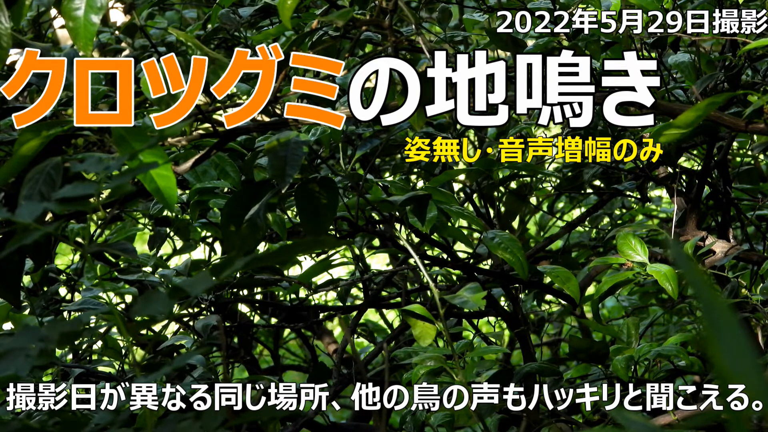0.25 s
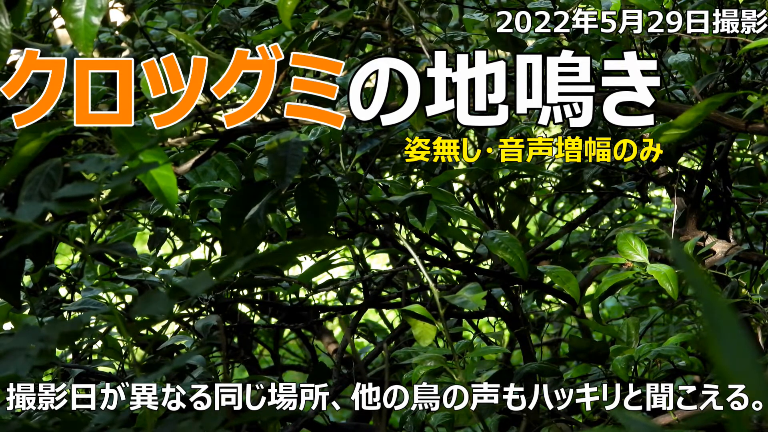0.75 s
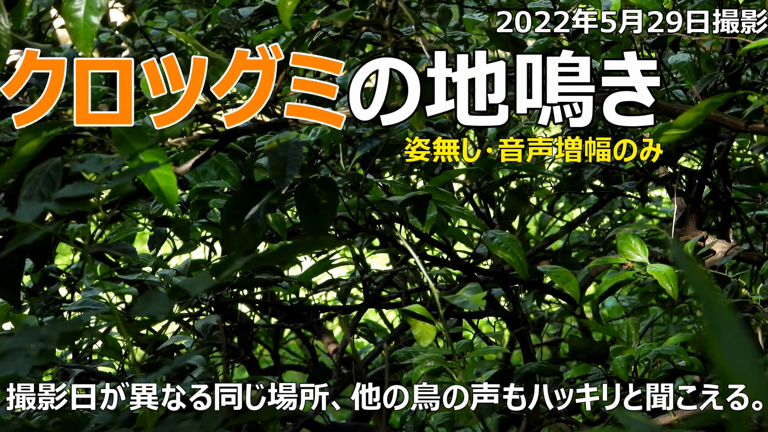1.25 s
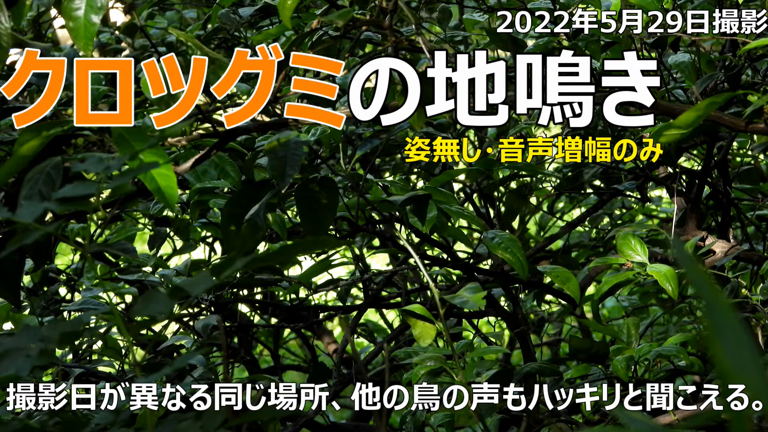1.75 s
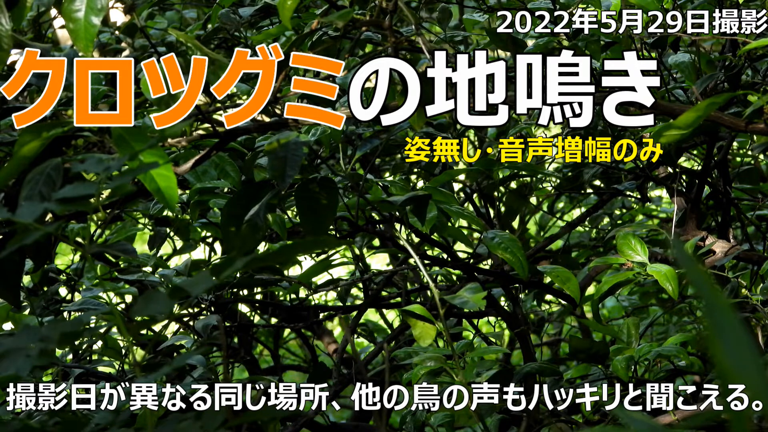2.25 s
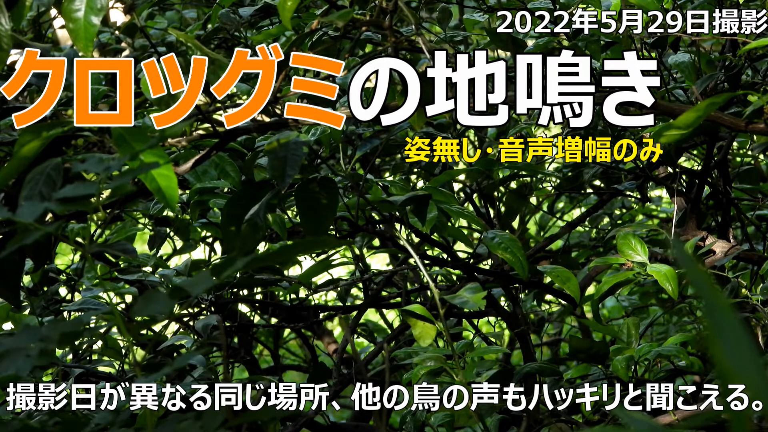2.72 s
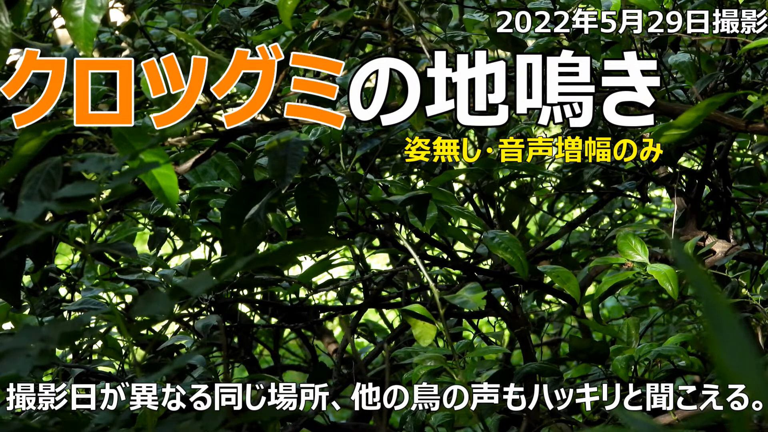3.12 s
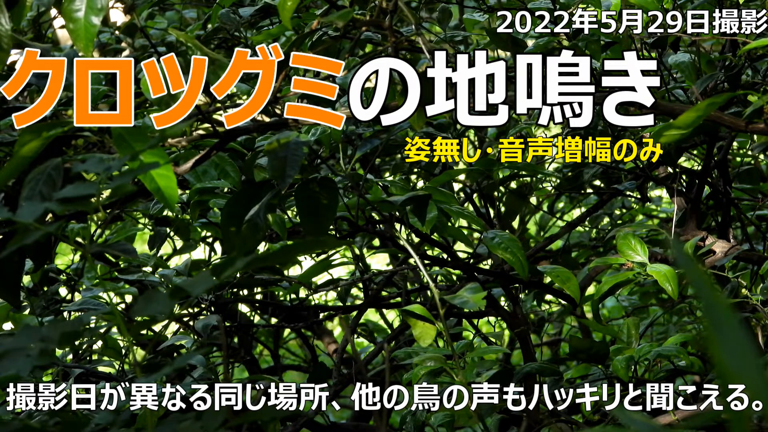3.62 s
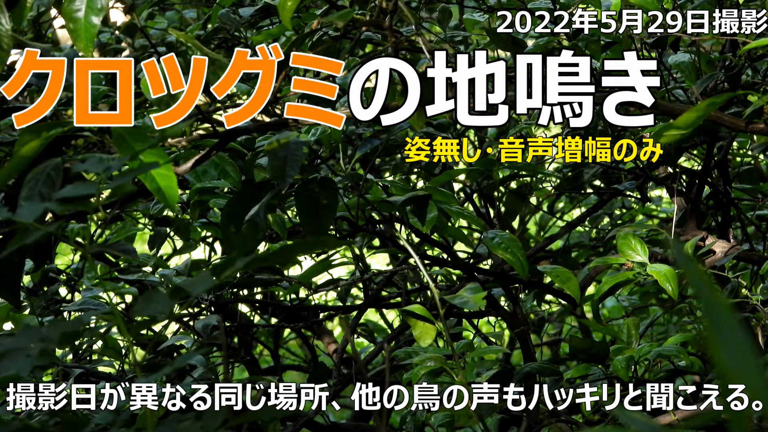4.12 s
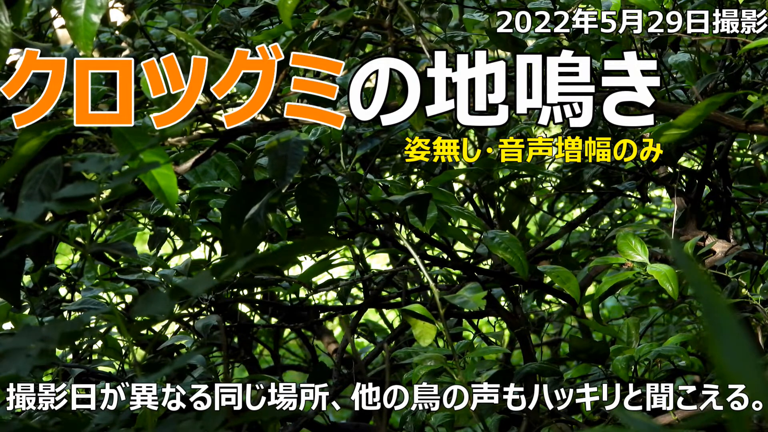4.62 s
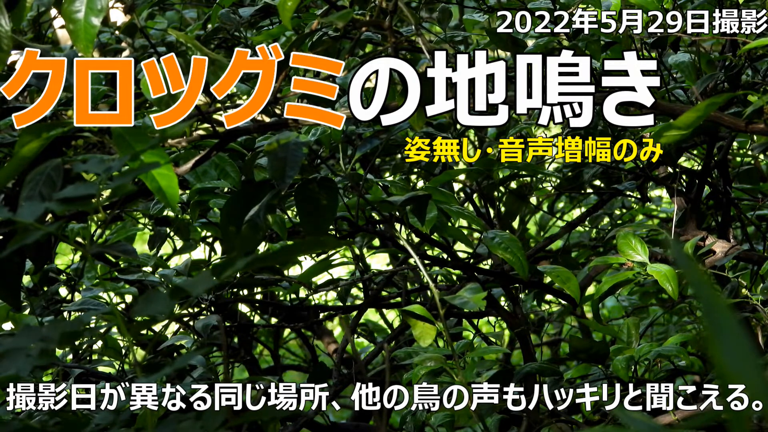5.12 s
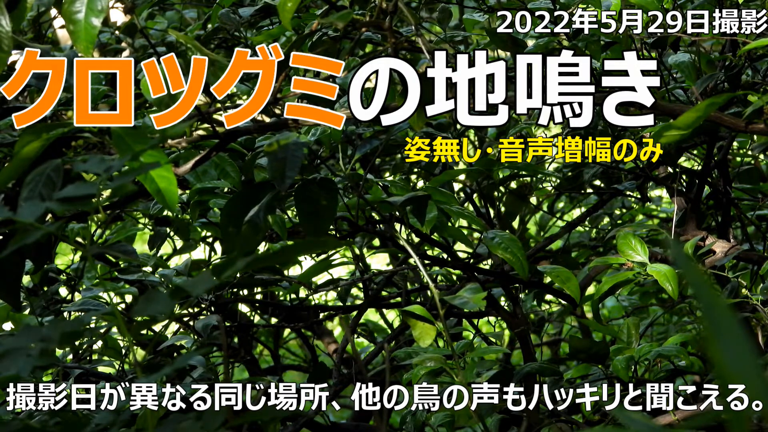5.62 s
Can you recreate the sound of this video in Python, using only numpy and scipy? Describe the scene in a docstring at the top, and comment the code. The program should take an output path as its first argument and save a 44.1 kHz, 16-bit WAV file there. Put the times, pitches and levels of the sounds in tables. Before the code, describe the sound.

A thrush on the left gives sharp chirps, three spaced then a quick run of six, amid hissing woodland with thin high whistles.

```python
"""Woodland undergrowth: a thrush to the left gives sharp chirps, three spaced out, then a quick run of six.
Thin high slides and three soft piping notes fall between them, and other birds call far off.
The calls are gliding tones, each scattered by leaves and trunks into a dying cloud of echoes.
Shaped noise makes a steady hiss and a low drone; near the end the sound breaks off for a moment,
then the hiss returns louder."""
import sys
import numpy as np
from scipy import signal
from scipy.fft import rfft, irfft
from scipy.io import wavfile
from scipy.ndimage import uniform_filter1d

SR = 44100
rng = np.random.default_rng(int(sys.argv[2]) if len(sys.argv) > 2 else 0)


def bounce(signal):
    """Save signal as a 16-bit WAV file at the path given by the first command-line argument."""
    frames = np.transpose(np.atleast_2d(signal))
    limited = np.clip(frames, -1, 1)
    pcm = np.round(limited * 32767).astype(np.int16)
    wavfile.write(sys.argv[1], SR, pcm)


N = 258423
TIME = np.arange(N) / SR
# the sound breaks off, then starts to fade back in [s]
BREAK_S, RETURN_S = 5.684, 5.734
# All levels in dB are relative settings, ahead of any later echoes, mixing and overall gain.


def from_db(db):
    """Turn decibels into a gain."""
    return 10 ** (np.asarray(db) / 20)


def rms_one(x):
    """Scale a sound to unit power."""
    return x / np.sqrt(np.mean(x ** 2) + 1e-20)


def in_time(rows, t=TIME):
    """Join each column of a curve by straight lines in time."""
    s, *columns = np.transpose(rows)
    return [np.interp(t, s, c) for c in columns]


def at_hz(points, hz):
    """Read a spectrum at given pitches, along a log-frequency axis."""
    f, value = np.transpose(points)
    return np.interp(np.log(np.maximum(hz, 1)), np.log(f), value)


def during(start, end):
    """Give the sample numbers of a stretch of time, kept inside the scene."""
    return np.arange(max(int(start * SR), 0), min(int(end * SR), N))


def drift(rate, size):
    """Wander at random: straight lines between points of spread 1, rate points per second."""
    knots = rng.standard_normal(4096)
    return np.interp(np.arange(size) * rate / SR, np.arange(len(knots)), knots)


def phase_of(hz):
    """Add up a gliding pitch into the running phase of its tone."""
    return 2 * np.pi * np.cumsum(hz) / SR


def envelope(t, length, attack, release):
    """Smooth attack, hold and release of a note that starts at t = 0."""
    rise = np.clip(t / attack, 0, 1)
    fall = np.clip((length - t) / release, 0, 1)
    return (np.sin(np.pi / 2 * rise) * np.sin(np.pi / 2 * fall)) ** 2


def narrow_noise(hz, width_hz):
    """Noise ringing in one resonance, at unit power."""
    r = np.exp(-np.pi * width_hz / SR)
    poles = [1, -2 * r * np.cos(2 * np.pi * hz / SR), r * r]
    return rms_one(signal.lfilter([1, 0, -1], poles, rng.standard_normal(N)))


def hiss():
    """Far leaves and air: noise that is partly shared by the two ears, with a treble that rises and falls."""
    # colour of the hiss; only its shape counts: (frequency [Hz], level per Hz [dB])
    colour_points = [(25, -30.5), (75, -34.5), (160, -9.5), (280, -3.5), (400, -7), (550, -10), (870, -7),
                     (1800, -16), (2900, -13), (3700, -18), (4500, -20), (6000, -28), (7800, -37.5),
                     (9000, -58.5)]
    # how alike the two ears are, held between 0 and 0.98 in use: (frequency [Hz], likeness)
    likeness = [(60, -0.31), (140, 1), (320, 0.67), (750, 0.39), (1730, 0.68), (4000, -2.6), (9260, -0.34)]
    # how far the hiss leans to the left: (frequency [Hz], left minus right [dB])
    left_lean = [(60, 0.0), (210, 1.0), (750, 0.5), (2630, 0.72), (9260, 0.29)]
    # treble curve; only its swing about the average counts: (time [s], level [dB])
    treble_curve = [(0.0, -65), (0.69, -73.5), (0.92, -67), (2.67, -61), (2.85, -68.5), (4.29, -61.5),
                    (5.6, -70)]
    level_db, return_db = -50.5, 4.5   # base level; extra from the break on
    low_db, treble_base_db = -1.37, 1.5
    swing_share = 0.54   # share of the treble swing that is followed

    hz = np.arange(N // 2 + 1) * SR / N
    mid, side = rfft(rng.standard_normal((2, N)))
    alike = np.clip(at_hz(likeness, hz), 0, .98)
    sides = np.array([[1], [-1]])
    rolloff = np.sqrt(1 + (hz / 10000) ** 24)
    colour = from_db(at_hz(colour_points, hz) + sides * at_hz(left_lean, hz) / 2) / rolloff
    ears = np.sqrt(1 + alike) * mid + sides * np.sqrt(1 - alike) * side
    air = rms_one(irfft(colour * ears, N))
    low = irfft(rfft(air) / (1 + (hz / 2000) ** 8), N)
    treble = air - low
    swing_db, = in_time(treble_curve)
    # the treble stops swinging at the break
    treble_db = treble_base_db + swing_share * (swing_db - swing_db.mean()) * (TIME < BREAK_S)
    loudness = from_db(level_db + return_db * (TIME > BREAK_S))
    return loudness * (from_db(low_db) * low + from_db(treble_db) * treble)


def drone():
    """A far low hum and a broad rush, both resonant noise, swell now and then under a faint steady tone."""
    # swells: (time of the peak [s], half width [s], added hum [dB], added rush [dB])
    swells = [(.4, .5, -88, -60.5), (.96, 0.21, -61, -62.5), (1.41, 0.032, -52.5, -85),
              (4.54, 0.076, -58.5, -68), (4.73, 0.11, -50.5, -76)]
    hum, rush = from_db(-62), from_db(-64)   # at rest
    for s, width, hum_db, rush_db in swells:
        swell = np.exp(-((TIME - s) / width) ** 2)
        hum = hum + from_db(hum_db) * swell
        rush = rush + from_db(rush_db) * swell
    sound = hum * narrow_noise(292.7, 52)
    sound = sound + rush * narrow_noise(430.0, 190)
    sound = sound + from_db(-61.5) * narrow_noise(772, 28)
    # distance dulls it
    return signal.sosfilt(signal.butter(2, 1100, fs=SR, output="sos"), sound)


def slides():
    """Nearly pure whistles that drop fast and level off, growing louder as they drop, with a slight tremble."""
    # slides: (time [s], length [s], level [dB], final pitch [Hz], glide time [s],
    #          bend: 1 eases off evenly, 2 lingers then plunges)
    slide_rows = [ (-.12, 0.21, -54, 6770, 0.069, 1.3), (1.24, .2, -40, 6780, 0.049, 1.18),
                  (1.748, 0.16, -40.5, 6734, .047, 1.62), (3.635, 0.21, -43.5, 7260, 0.062, 1),
                  (5.093, 0.27, -43, 6850, 0.094, 1.15)]
    start_hz = 9960   # every slide heads down from here
    faint_db, faint_power = -31.5, 2.38   # how much fainter the top is, and how soon that wears off
    attack_s, release_s = 0.011, 0.047
    out = np.zeros(N)
    for s, length, level_db, final_hz, glide, bend in slide_rows:
        at = during(s, s + length)
        t = np.maximum(TIME[at] - s, 0)
        height = np.exp(-(t / glide) ** bend)   # 1 at the top, towards 0 at the final pitch
        hz = final_hz + (start_hz - final_hz) * height
        loudness = from_db(level_db + faint_db * height ** faint_power)
        loudness = loudness * envelope(t, length, attack_s, release_s)
        phase = phase_of(hz * (1 + .007 * drift(350, len(at))))
        out[at] += loudness * np.sin(phase)
    return out


def chirp_gesture(t, level_db, crest_hz, lowest_hz, catch, fall, upsweep_db):
    """Pitch and loudness of a chirp, t from its crest: upsweep, catch, scoop, loud fall and faint trail."""
    # the soft upsweep grows as it climbs
    upsweep_s, upsweep_from_hz, upsweep_to_hz, growth_db = 0.0089, 2450, 3815, 3.5
    # the voice returns for the last share of the catch and scoops up to the crest
    voiced_share, scoop_hz_per_s = .55, 60400
    # it falls towards its lowest pitch, fading, and trails off for a further share of the fall
    steepness, fade_db, trail_db = 1.42, 7, -10
    attack_s, release_s = 0.0013, 0.0043

    voiced = voiced_share * catch
    swept = t + catch + upsweep_s
    climbed = np.minimum(swept / upsweep_s, 1)
    up_hz = upsweep_from_hz + (upsweep_to_hz - upsweep_from_hz) * climbed
    scoop_hz = crest_hz + scoop_hz_per_s * voiced * np.sin(np.pi * t / voiced)
    fallen = np.maximum(t, 0) / fall
    fall_hz = lowest_hz + (crest_hz - lowest_hz) * np.exp(-steepness * fallen)
    hz = np.select([t < -voiced, t < 0], [up_hz, scoop_hz], fall_hz)

    upsweep = from_db(upsweep_db - growth_db * (1 - climbed))
    upsweep = upsweep * envelope(swept, upsweep_s + attack_s, attack_s, attack_s)
    loud = envelope(t + voiced, voiced + fall, attack_s, release_s)
    trail = from_db(trail_db) * envelope(t, fall * (1 + TRAIL_SHARE), fall, fall)
    return hz, upsweep + from_db(level_db - fade_db * fallen) * (loud + trail)


# lead-in and trail of a chirp: upsweep length [s], and trail as a share of the fall
UPSWEEP_S, TRAIL_SHARE = 0.0089, 2.2


def chirps(tremble=0.041, upper_tremble=0.034):
    """The syrinx (voice organ) runs through fast gestures: gives the main voice, and the upper voice with rasp."""
    # chirps: (time of the crest [s], level [dB], crest pitch [Hz], lowest pitch [Hz],
    #          catch before the crest [s], length of the fall [s], upsweep [dB], rasp [dB],
    #          upper voice pitch [Hz], upper voice level [dB])
    chirp_rows = [ (.068, -24.5, 3550, 1490, .001, .0125, -26, -23, 4100, -55),
                  (.798, -21.5, 3567, 1520, .001, .013, -23.5, -13.5, 4860, -34),
                  (1.031, -22.5, 3635, 1780, .0115, .017, -27.5, -7, 4180, -28.5),
                  (4.0279, -20.5, 3156, 1753, .009, .0155, -26, -15.5, 4316, -27),
                  (4.1917, -21, 3335, 1790, .009, 0.012, -28.5, -10.5, 4380, -26),
                  (4.2802, -22, 3240, 1778, .009, 0.013, -29, -9, 4260, -26),
                  (4.4002, -22, 3390, 1860, .0085, 0.014, -30.5, -11, 4260, -30),
                  (4.5446, -20, 3518, 1857, .009, 0.014, -27.5, -11, 4560, -26),
                  (4.7922, -20, 3600, 1885, .012, 0.012, -28.5, -6.5, 4380, -26)]
    # overtone colour of the thrush's throat: (frequency [Hz], level [dB])
    throat = [(3000, -18), (4500, 8.5), (5200, -9.5), (6200, -8), (7200, -12), (8300, -24), (11500, -46.5)]
    # the upper voice joins at the crest, arches over and droops (a share of its pitch)
    upper_s, top_s, droop = 0.0175, 0.0048, 0.23
    upper_attack_s, upper_release_s = 0.0029, 0.0064
    main, upper = np.zeros((2, N))
    for s, level_db, crest_hz, lowest_hz, catch, fall, upsweep_db, rasp_db, upper_hz, upper_db in chirp_rows:
        at = during(s - catch - UPSWEEP_S, s + fall * (1 + TRAIL_SHARE))
        hz, loudness = chirp_gesture(TIME[at] - s, level_db, crest_hz, lowest_hz, catch, fall, upsweep_db)
        hz = hz * (1 + tremble * drift(869, len(at)))
        phase = phase_of(hz)
        main[at] += loudness * np.sin(phase)
        # rasp: overtones roughened by a fast random wander
        overtones = sum(from_db(at_hz(throat, k * hz)) * np.sin(k * phase) for k in (2, 3))
        upper[at] += loudness * from_db(rasp_db) * overtones * drift(2500, len(at))
        # the other side of the syrinx sounds a short note of its own
        at = during(s, s + upper_s)
        t = TIME[at] - s
        hz = upper_hz * (1 - droop * ((t - top_s) / (upper_s - top_s)) ** 2)
        hz = hz * (1 + upper_tremble * drift(950, len(at)))
        loudness = from_db(upper_db) * envelope(t, upper_s, upper_attack_s, upper_release_s)
        upper[at] += loudness * np.sin(phase_of(hz))
    return main, upper


def faint_notes(count=40):
    """List the faintest birds' notes: one repeated falling tick, and short glides at random times and pitches."""
    # ticks of a small far bird: (time [s], level [dB])
    ticks = [(0.329, -62), (3.209, -62.5), (3.37, -64), (4.701, -63)]
    tick_s, tick_hz, tick_warble = 0.05, (7800, 7400, 7140), .015
    notes = [(s, tick_s, *tick_hz, level_db, tick_warble) for s, level_db in ticks]

    per_s, typical_s, level_db = 3.3, .1, -65
    lowest_hz, highest_hz = 3780, 6470   # range of the middle pitch
    most_glide, warble = .08, .05   # shares of the pitch; the glide is to either side of the middle
    for k, (when, size, height, slope) in enumerate(rng.random((count, 4))):
        start = (k + when) / per_s
        length = typical_s * (.5 + size)
        hz = lowest_hz * (highest_hz / lowest_hz) ** height
        glide_hz = hz * most_glide * (2 * slope - 1)
        notes.append((start, length, hz - glide_hz, hz, hz + glide_hz, level_db, warble))
    return notes


def far_calls(calls, nasal=False):
    """Each note swells and fades along a curved, warbling glide: a pure tone, or a stack of harmonics."""
    # overtone colour of the nasal calls: (frequency [Hz], level [dB])
    nasal_colour = [(1700, -25), (2700, -2.5), (3500, 3), (4400, -9), (7100, -5.5), (8000, -9), (9000, -64)]
    out = np.zeros(N)
    for s, length, first_hz, middle_hz, last_hz, level_db, warble in calls:
        at = during(s, s + length)
        along = np.clip((TIME[at] - s) / length, 0, 1)
        curve = np.polyfit([0, .5, 1], [first_hz, middle_hz, last_hz], 2)
        hz = np.polyval(curve, along)
        phase = phase_of(hz * (1 + warble * drift(220, len(at))))
        if nasal:
            tone = sum(from_db(at_hz(nasal_colour, k * hz)) * np.sin(k * phase) for k in range(2, 11))
        else:
            tone = np.sin(phase)
        out[at] += from_db(level_db) * np.sqrt(abs(np.sin(np.pi * along))) * tone
    return out


def pipes(fourth_db=-29, sixth_db=-56, fifth_db=-17):
    """The throat picks out the second harmonic; the odd ones break through as a note arches over and sags."""
    # piping notes: (time [s], length [s], top of the fundamental [Hz],
    #                scoop into the note [share of the pitch], level [dB], odd harmonics [dB])
    pipe_rows = [ (1.901, 0.16, 1617, .13, -37.5, -75), (2.184, .118, 1608, .1, -32, -66),
                 (2.38, .165, 1649, .19, -29, -54.5)]
    top, attack, release = .52, 0.32, 0.42   # shares of the note
    sag, odd_rise_db = 0.078, 15.5   # final sag as a share of the pitch; how it lifts the odd harmonics
    out = np.zeros(N)
    for s, length, top_hz, scoop, level_db, odd_db in pipe_rows:
        at = during(s, s + length)
        along = (TIME[at] - s) / length
        rising = np.maximum(1 - along / top, 0) ** 3
        sagging = np.maximum((along - top) / (1 - top), 0) ** 2
        hz = top_hz * (1 - scoop * rising - sag * sagging)
        phase = phase_of(hz * (1 + .0035 * drift(200, len(at))))
        flutter = from_db(4.5 * drift(70, len(at)))
        high_even = from_db(fourth_db) * np.sin(4 * phase) + from_db(sixth_db) * np.sin(6 * phase)
        even = np.sin(2 * phase) + flutter * high_even
        odd = flutter * (np.sin(3 * phase) + from_db(fifth_db) * np.sin(5 * phase))
        soft_ends = signal.windows.tukey(len(at), .2)
        out[at] += from_db(level_db) * envelope(along, 0.97, attack, release) * even
        out[at] += from_db(odd_db + odd_rise_db * sagging) * soft_ends * odd
    return out


def scatter(t60, onset_s):
    """A cloud of echoes in each ear, dying by 60 dB in t60 seconds, of unit energy and even colour."""
    t = np.arange(SR) / SR
    shape = from_db(-60 * t / t60) * (1 - np.exp(-(t / onset_s) ** 2))
    cloud = rng.standard_normal((2, SR)) * shape
    spectrum = rfft(cloud)
    smooth_power = uniform_filter1d(abs(spectrum) ** 2, size=250, axis=1)
    cloud = irfft(spectrum / np.sqrt(smooth_power), SR)
    cloud *= t < t60
    return cloud / np.sqrt(np.sum(cloud ** 2, axis=1, keepdims=True))


def woodland(x, place, leaves_db, leaves_t60, trees_db, trees_t60):
    """Direct sound, quick scatter from nearby leaves and a long tail from the trunks, ever more from all round."""
    pan_db, lag_s = place
    lean_db = pan_db * np.array([[.5], [-.5]])
    leaves = from_db(leaves_db + .6 * lean_db) * scatter(leaves_t60, .003)
    trees = from_db(trees_db + .28 * lean_db) * scatter(trees_t60, .015)
    response = leaves + trees
    # the direct sound reaches the right ear a little later
    response[[0, 1], [0, round(lag_s * SR)]] += from_db(lean_db[:, 0])
    return signal.fftconvolve(x[None], response, axes=1)[:, :N]


def scene():
    """Each caller sits at its own depth in the wood; the farthest are heard mostly by their echoes."""
    # the clearer distant birds, then distant nasal calls: (time [s], length [s], start pitch [Hz],
    #     middle pitch [Hz], end pitch [Hz], level [dB], warble [share of the pitch])
    far_notes = [ (1.54, 0.3, 3690, 3930, 3660, -54, 0.049), (1.56, 0.18, 2741, 2373, 2186, -52.5, .06),
                 (1.82, 0.14, 4680, 4740, 4080, -53, .011), (2.01, .08, 3490, 3505, 3500, -48, .008),
                 (2.19, 0.1, 2430, 2505, 2340, -47.5, 0.032), (2.375, 0.12, 3690, 3690, 3695, -47, .003),
                 (2.86, 0.25, 2590, 2413, 2160, -51.5, 0.077), (3.08, 0.2, 2424, 2650, 2750, -51.5, 0.09),
                 (3.25, .18, 2427, 2976, 3510, -50, 0.065), (3.6, 0.26, 2690, 3071, 2803, -49.5, 0.11),
                 (3.92, 0.081, 2860, 2690, 2490, -48, 0.019), (3.94, 0.089, 6450, 6080, 6150, -55, 0.025),
                 (4.755, .034, 5730, 5960, 5850, -50.5, .014), (4.91, 0.1665, 2610, 2710, 2744, -46, 0.023),
                 (5.06, 0.28, 2797, 2794, 2782, -48, 0.018), (5.33, 0.18, 1750, 1832, 1903, -56, .026),
                 (5.6, 0.096, 3700, 3220, 3010, -48.5, 0.027),
                 (5.76, 0.075, 5060, 5150, 5170, -47.5, 0.019), (5.805, .057, 3010, 3840, 3870, -40, 0.041)]
    far_cries = [(3.405, 0.061, 802, 867, 887, -51, 0.014), (3.525, 0.083, 850, 888, 872.5, -54.5, 0.014),
                 (3.68, 0.086, 870, 897, 882, -54, 0.015)]
    # where each caller sits: (left minus right of the direct sound [dB], lag of the right ear [s])
    thrush_at, sheen_at, slides_at = (13, .00007), (2, .00009), (7, .00009)
    pipes_at, far_at = (2.5, .00001), (0, 0)

    high = woodland(slides(), slides_at, leaves_db=-3, leaves_t60=.15, trees_db=-1.5, trees_t60=.9)
    main, upper = chirps()
    thrush = woodland(from_db(-8.0) * main, thrush_at,
                      leaves_db=1.5, leaves_t60=0.097, trees_db=0.0, trees_t60=0.69)
    # foliage screens the thrush's highest sounds, which arrive mainly as scatter
    sheen = woodland(from_db(-9.5) * upper, sheen_at,
                     leaves_db=3, leaves_t60=0.19, trees_db=2, trees_t60=0.82)
    distant = far_calls(far_notes) + far_calls(faint_notes()) + far_calls(far_cries, nasal=True)
    far = woodland(from_db(-5) * distant, far_at,
                   leaves_db=1.5, leaves_t60=0.29, trees_db=2.0, trees_t60=0.85)
    soft = woodland(pipes(), pipes_at, leaves_db=-13, leaves_t60=.16, trees_db=-8, trees_t60=.85)
    return hiss() + drone() + high + thrush + sheen + far + soft


def record(dry):
    """Set the overall level, drop it briefly at the break, and cut the top."""
    gain_db, break_db = 5, -38.5
    fade_out_s, fade_in_s = 0.0044, 0.018
    start_s = BREAK_S - fade_out_s
    gap = envelope(TIME - start_s, RETURN_S + fade_in_s - start_s, fade_out_s, fade_in_s)
    level = from_db(gain_db + break_db * gap)
    # at least 60 dB down from 12 kHz up
    top_cut = signal.cheby2(12, 60, 12000, fs=SR, output="sos")
    return signal.sosfilt(top_cut, dry * level)


dry = scene()
out = record(dry)
bounce(out)
```